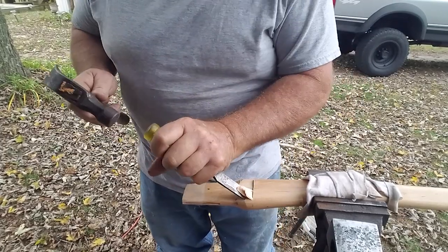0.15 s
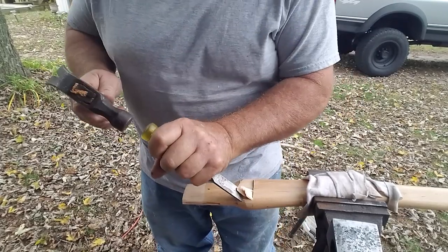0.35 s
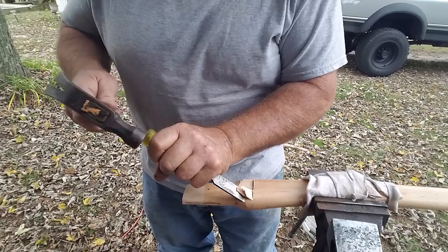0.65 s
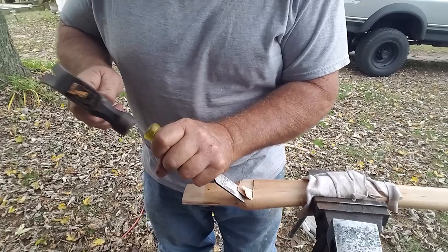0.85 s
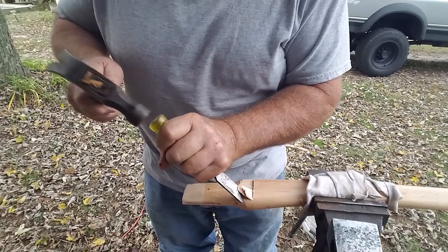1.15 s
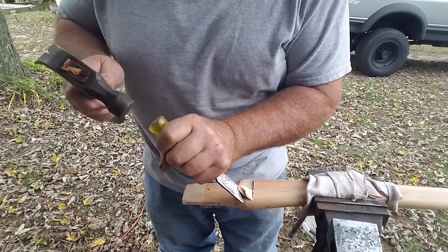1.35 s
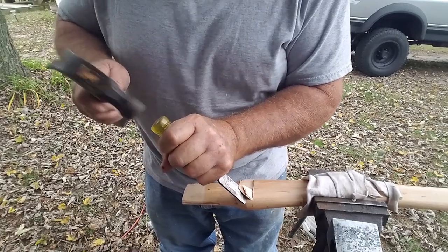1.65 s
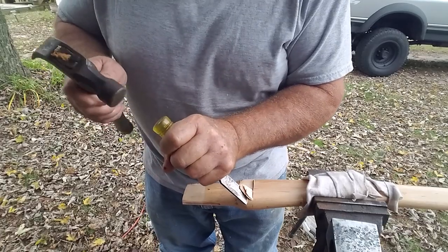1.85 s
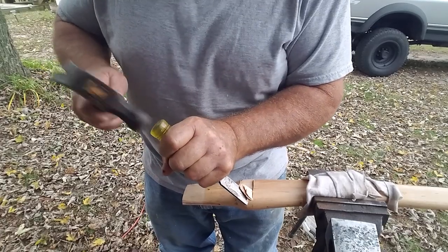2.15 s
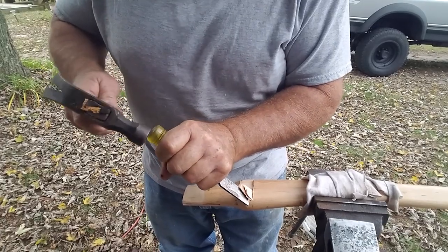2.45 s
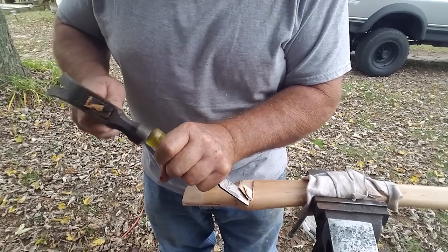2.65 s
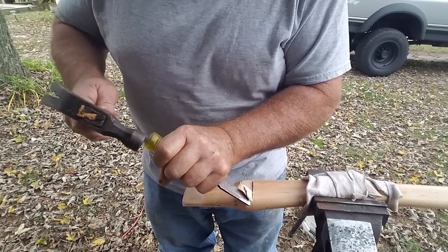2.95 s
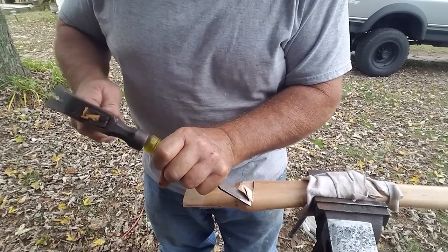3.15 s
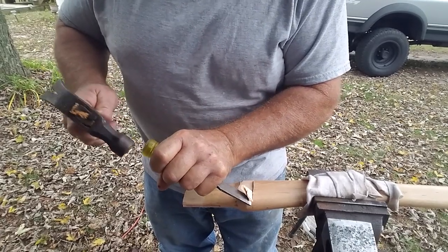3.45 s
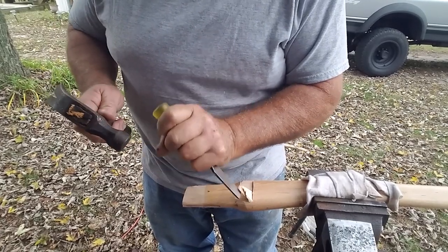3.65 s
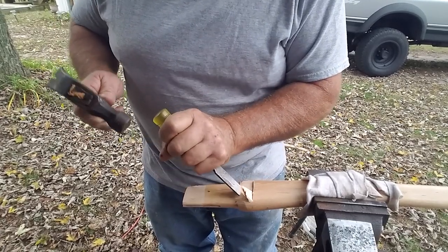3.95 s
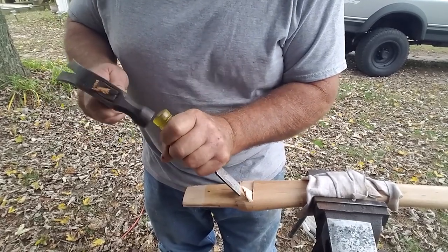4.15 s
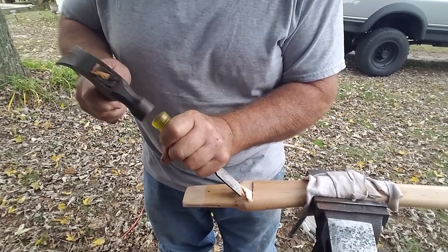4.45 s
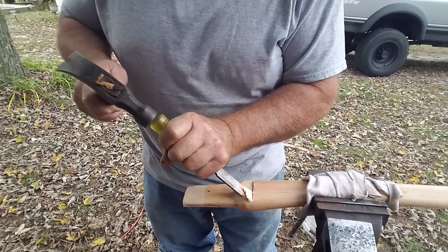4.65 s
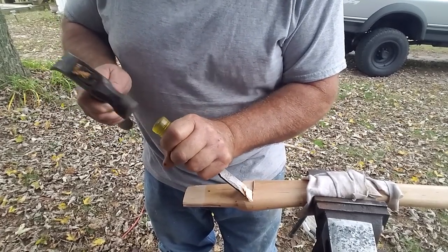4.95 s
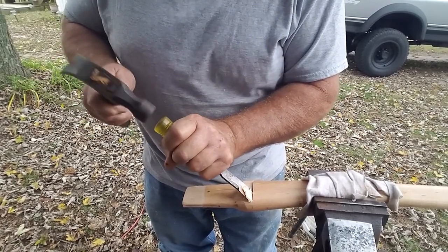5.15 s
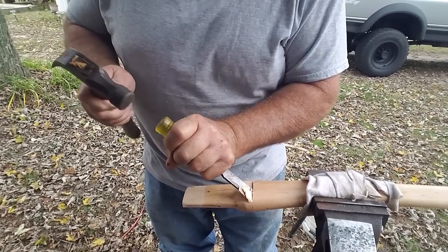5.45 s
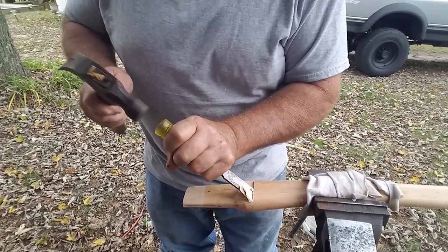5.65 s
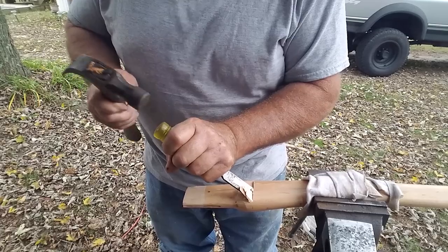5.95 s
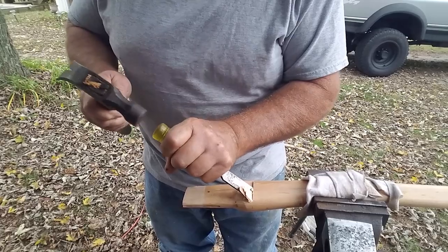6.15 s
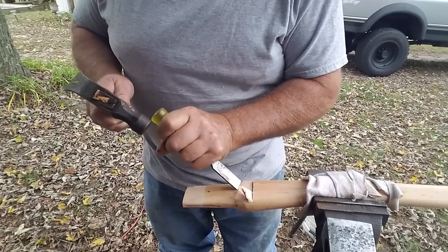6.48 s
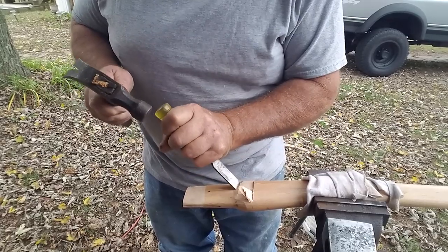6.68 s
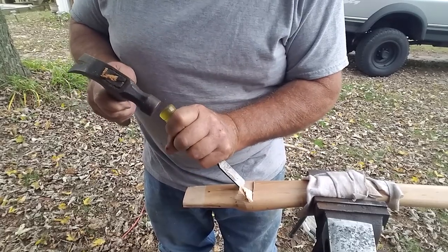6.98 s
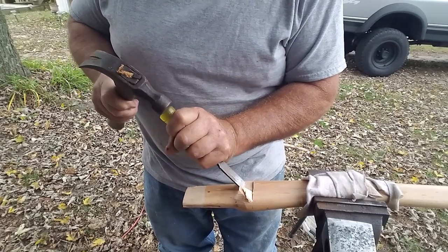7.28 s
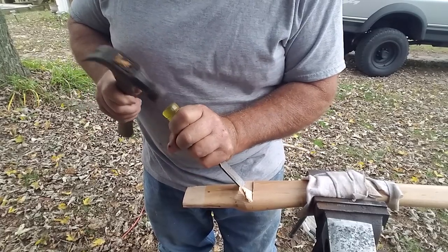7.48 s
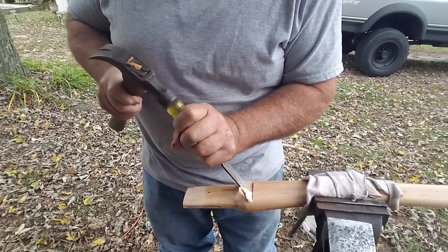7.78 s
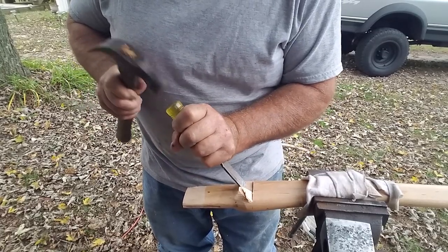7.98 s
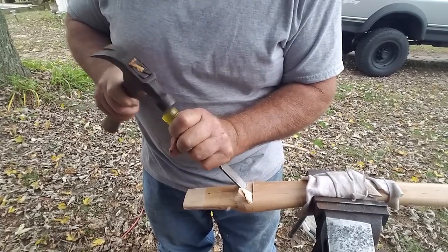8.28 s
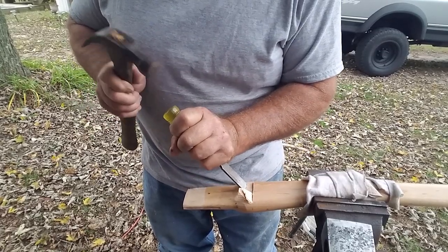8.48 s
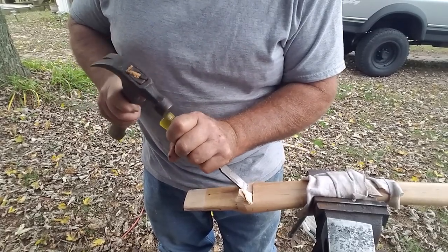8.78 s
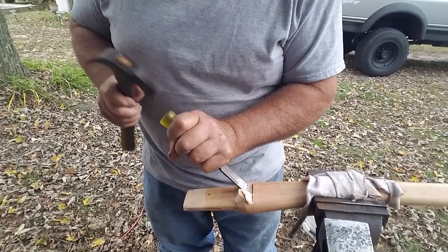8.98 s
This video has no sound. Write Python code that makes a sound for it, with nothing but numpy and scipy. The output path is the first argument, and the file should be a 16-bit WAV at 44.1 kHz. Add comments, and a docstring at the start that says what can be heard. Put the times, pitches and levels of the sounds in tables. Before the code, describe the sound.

Light taps build into steady hard hammer blows on a chisel in clamped wood, a loose vise bar rattling, faint birdsong behind.

```python
"""Runs of hammer blows on a chisel: each a crack and a woody knock, then a bench thump and sway.
The chisel cuts a wooden tool handle clamped in a bench vise; light taps seat it between the runs.
Hard, sharp blows throw up the vise's loose steel bar, which clanks down and rings.
Behind: steady air, a chirping bird, faint far whines. Bodies are sums of damped modes plus shaped noise.
"""
import sys
import numpy as np
from scipy import signal
from scipy.fft import rfft, irfft, next_fast_len
from scipy.io import wavfile

SR = 44100
rng = np.random.default_rng(int(sys.argv[2]) if len(sys.argv) > 2 else 0)


def persist_wave(psi):
    """Save psi, clipped to +-1, as 16-bit WAV."""
    counts = np.round(np.clip(psi, -1, 1) * 32767).astype(np.int16)
    wavfile.write(sys.argv[1], SR, np.atleast_2d(counts).T)


N = 402191
AGE = np.arange(int(.2 * SR)) / SR  # s, time axis of a short sound
LONG = np.arange(int(.55 * SR)) / SR  # s, time axis of a long ring


def amp(db):
    """Decibels to gain."""
    return 10 ** (np.asarray(db) / 20)


def along(points, hz):
    """Interpolate (f/Hz, value) points on a log frequency axis."""
    f, v = np.transpose(points)
    return np.interp(np.log(hz + 1), np.log(f), v)


def filtered(x, response):
    """Multiply the spectrum of x by response(f/Hz)."""
    size = x.shape[-1]
    padded = next_fast_len(size + size // 16, True)
    spectrum = rfft(x, padded) * response(np.fft.rfftfreq(padded, 1 / SR))
    return irfft(spectrum, padded)[..., :size]


def noise(spectrum, size, spread):
    """Coloured stereo noise, rms 1; spread is the gain of the part that differs between channels."""
    white = rng.standard_normal((2, size))
    mid, side = filtered(white, lambda hz: amp(along(spectrum, hz)))
    pair = np.array([mid + spread * side, mid - spread * side])
    return pair / pair.std()


def dying(x, decay):
    """Fade each frequency of x with its own t60."""
    hz, t, z = signal.stft(x, SR, nperseg=128)
    fade = amp(-60 * t / along(decay, hz)[:, None])
    return signal.istft(z * fade, SR, nperseg=128)[1][:, :x.shape[1]]


def burst(x):
    """Scale a short sound to the energy of 10 ms at rms 1."""
    energy = np.mean(x ** 2) * x.shape[-1] / SR * 100
    return x / np.sqrt(energy)


def any_phase():
    """Random phase in radians."""
    return rng.uniform(0, 2 * np.pi)


def mode(hz, t60, attack, phase=0, t=AGE):
    """One damped vibration: exponential build-up (time constant attack, s) and decay (t60, s)."""
    envelope = np.exp(-np.log(1000) * t / t60) * (1 - np.exp(-t / attack))
    return np.sin(2 * np.pi * hz * t + phase) * envelope


def ring(modes, attack, scatter_db, detune):
    """All modes of a body; level, pitch and phase vary from strike to strike."""
    out = 0
    for k, (hz, db, t60) in enumerate(modes):
        level_dev, pitch_dev, phase_dev = rng.standard_normal(3)
        gain = amp(db + scatter_db * level_dev)
        out = out + gain * mode(hz * (1 + detune * pitch_dev), t60, attack, k * np.pi + phase_dev / 2)
    return out


def add(track, s, sound):
    """Mix a sound into a track at time s."""
    part = track[:, max(round(s * SR), 0):][:, :sound.shape[-1]]
    part += sound[..., :part.shape[1]]


def wobble(rate):
    """Random piecewise-linear curve, rate knots/s."""
    knots = rng.standard_normal(4096)
    return np.interp(np.arange(N) * rate / SR, np.arange(len(knots)), knots)


# crowded wood and iron modes, spectrum: (f/Hz, relative level/dB)
CLATTER_SPECTRUM = [(60, -19), (250, -5), (600, 2), (1000, 6.5), (1700, -0.5), (2700, -9.5), (3800, -15),
                    (4800, -20.5), (7000, -25.5), (10000, -35), (15500, -58)]
# their decay: (f/Hz, t60/s)
CLATTER_DECAY = [(200, 0.25), (1000, 0.057), (3000, 0.08), (12000, 0.095)]


def clatter(spread):
    """Many short, crowded modes of wood and iron, as noise decaying per frequency."""
    return burst(dying(noise(CLATTER_SPECTRUM, size=len(AGE), spread=spread), CLATTER_DECAY))


# outdoor air, spectrum: (f/Hz, relative level/dB)
AIR_SPECTRUM = [(25, -11), (60, -1), (150, -2.5), (250, -3.5), (450, -0.5), (700, -4.5), (1100, -11.5),
                (2000, -15.5), (2650, -14.5), (3600, -20), (5100, -22.5), (6000, -19), (6900, -29),
                (9000, -33.5), (14000, -27)]
# far whining tones: (t/s, length/s, f/Hz at mid-tone, level/dB)
WHINE_TONES = [(5.95, .75, 1570, -74), (6.45, .8, 1385, -68), (6.5, .8, 1855, -67), (6.45, .75, 1680, -69),
               (6.95, 1.35, 1660, -62)]
WHINE_ARCH = .02  # share by which a tone is flatter at its ends


def distance():
    """Steady air noise, and faint wavering whines that swell, arch in pitch and fade."""
    out = amp(-56.5) * noise(AIR_SPECTRUM, size=N, spread=.85)
    for start_s, length_s, hz, db in WHINE_TONES:
        arch = np.sin(np.pi * np.clip((np.arange(N) / SR - start_s) / length_s, 0, 1))
        level = amp(db + 3.5 * wobble(rate=24)) * arch ** 1.5
        waver_hz = 7 * wobble(rate=5) + 26 * wobble(rate=70)
        pitch_hz = hz * (1 - WHINE_ARCH * (1 - arch)) + waver_hz
        out = out + level * np.sin(2 * np.pi * np.cumsum(pitch_hz) / SR)
    return out


# decay of the yard's scatter: (f/Hz, t60/s)
YARD_DECAY = [(100, 4), (300, 0.54), (1000, 0.54), (4000, 0.47), (12000, 0.093)]


def yard(x):
    """A thin scatter from trees and ground, and one dull echo off a wall."""
    t = np.arange(SR) / SR
    tail = dying(rng.standard_normal((2, SR)), YARD_DECAY) * (1 - np.exp(-t / 0.012))
    response = amp(-36.5) * tail / np.linalg.norm(tail[0])
    wall = signal.windows.hann(11) / 5
    add(response, .094, amp(-40) * wall)
    return signal.oaconvolve(x, response, axes=1)[:, :N]


# two-note calls: (t/s, 2nd note level/dB)
CALLS = [(1.562, -49), (2.322, -54), (3.874, -49), (4.736, -47), (6.312, -54), (7.056, -51), (7.498, -48),
         (7.9, -58.5), (8.42, -55), (8.89, -58)]
NOTE_GAP_S, FIRST_NOTE_DB = .063, -4  # first note relative to second
NOTE_HZ, NOTE_STEP_HZ = 4276, 20
NOTE_FALL_HZ_PER_S, NOTE_FALL_HZ = 8000, 327


def bird():
    """Pairs of short falling whistles, the second louder and higher, blurred by the trees."""
    out = np.zeros((2, N))
    for s, db in CALLS:
        for k, note_db in enumerate([db + FIRST_NOTE_DB, db]):
            fall_hz = np.minimum(NOTE_FALL_HZ_PER_S * AGE, NOTE_FALL_HZ)
            hz = NOTE_HZ + k * NOTE_STEP_HZ - fall_hz
            swell = np.exp(-((AGE - .018) / .0095) ** 2)
            note = swell * np.sin(2 * np.pi * np.cumsum(hz) / SR)
            leaves = rng.standard_normal((2, len(AGE))) * amp(-60 * AGE / 0.19)
            leaves = leaves / np.linalg.norm(leaves[0])
            blur = signal.fftconvolve(note[None], leaves, axes=1)[:, :len(AGE)]
            add(out, s + k * NOTE_GAP_S, amp(note_db) * (note + 0.94 * blur))
    return out


# chisel shifting in its cut: (t/s, rub level/dB, wood hum level/dB)
CHISEL_SHIFTS = [(.215, -56, -64), (.255, -51, -48.5), (0.324, -51.5, -50.5), (.722, -49, -79),
                 (2.513, -40, -28.5), (6.143, -56, -58), (6.491, -37.5, -29), (6.609, -42, -34),
                 (8.108, -44.5, -34.5)]


def shifts():
    """The blade rubs softly in the cut (band-shaped clatter) and stirs two modes of the clamped wood."""
    out = np.zeros((2, N))
    for s, rub_db, hum_db in CHISEL_SHIFTS:
        rub = filtered(clatter(spread=0.36), lambda hz: hz / (hz + 600) / (1 + (hz / 3200) ** 2))
        rub = rub * (1 - np.exp(-AGE / 0.057))
        hum = ring([(312, 0, .12), (255, -6, .07)], attack=.012, scatter_db=1.5, detune=.02)
        add(out, s, amp(rub_db - 1) * burst(rub) + amp(hum_db) * burst(hum))
    return out


# off-centre blows that set the blade singing: (t/s, level/dB)
BLADE_SINGS = [(2.165, -50), (5.531, -33.5), (6.005, -33.5), (8.534, -36), (8.778, -38), (9.013, -51)]


def blade():
    """The free length of steel rings in two high modes."""
    out = np.zeros((2, N))
    for s, db in BLADE_SINGS:
        add(out, s, amp(db) * (mode(8870, .125, .003) + amp(-6) * mode(14300, .13, .003)))
    return out


FIRM_THUMP_DB, FIRM_CRACK_DB = -12, -25  # reference blow for bar and bench

# vise bar modes: (f/Hz, relative level/dB, t60/s, group: 0 clank, 1 low, 2 middle, 3 high ring)
BAR_MODES = [(2380, 6.5, .075, 0), (2490, 2, .07, 0), (2720, -3, .08, 0), (1500, -4, .09, 0),
             (3090, -6, .1, 0), (3490, 14, .47, 1), (6218, 2, .24, 2), (6514, 9, .11, 2), (6834, 9, .16, 2),
             (7887, 2, .17, 2), (8866, 14, .13, 2), (8993, 8, .12, 2), (9590, 4, .11, 2),
             (14300, 9, .13, 2), (15140, 6, .13, 2), (11350, 17, .21, 3)]
# ring damped by the socket, for the reference blow: (low, middle, high level/dB)
HELD_RING_DB = (-67.5, -73.5, -89.5)
# blows after which the bar hangs free: (t/s, low, middle, high ring level/dB)
FREE_BAR_RINGS = [(2.16, -53, -50, -63), (2.4, -67, -51.5, -57.5), (2.88, -58, -61.5, -86),
                  (3.11, -54.5, -66, -97.5), (3.32, -51, -81, -92), (4.34, -61.5, -79.5, -87),
                  (5.77, -58.5, -65.5, -86), (8.27, -52.5, -77, -101.5), (8.77, -58.5, -66.5, -82),
                  (9.01, -59.5, -60, -90)]
THROW_THUMP_DB, THROW_CRACK_DB = -15, -34  # bar jumps only when both are exceeded
BAR_FLIGHT_S = .0275
CLANK_DB, CLANK_PER_THUMP_DB, CLANK_PER_CRACK_DB = -29.5, 1.92, 0.69
CHATTER_GAP_S = .007  # mean
CHATTER_LOSS_DB, CLACK_LOSS_DB = 8, 5.5  # per contact


def vise_bar():
    """Thrown up by a hard blow, the loose bar drops back, chatters in its socket and rings on."""
    out = np.zeros((2, N))
    for s, *_, crack_db, thump_db in BLOW_LIST:
        if thump_db <= THROW_THUMP_DB or crack_db <= THROW_CRACK_DB:
            continue
        throw_db = CLANK_PER_THUMP_DB * (thump_db - FIRM_THUMP_DB)
        throw_db += CLANK_PER_CRACK_DB * (crack_db - FIRM_CRACK_DB)
        free = [levels for at, *levels in FREE_BAR_RINGS if abs(at - s) < .05]
        ring_db = free[0] if free else np.add(HELD_RING_DB, throw_db)
        group_db = [CLANK_DB + throw_db, *ring_db]
        landing_s = s + BAR_FLIGHT_S
        for hz, db, t60, group in BAR_MODES:
            gain = amp(db + group_db[round(group)] + rng.normal(0, 0.91))
            add(out, landing_s, gain * mode(hz, t60, .001, any_phase(), LONG))
        # ever weaker contacts at uneven moments; the clack loses less per contact than the noise
        gaps_s = CHATTER_GAP_S * (.5 + rng.random(size=3))
        for k, late_s in enumerate(np.cumsum([0, *gaps_s])):
            clack = amp(6.5 - CLACK_LOSS_DB * k) * mode(2460 * rng.normal(1, 0.024), 0.042, .0008)
            chatter = amp(5.0 - CHATTER_LOSS_DB * k) * clatter(spread=0.81)
            add(out, landing_s + late_s, amp(group_db[0]) * (chatter + clack))
    return out


# vise-on-bench modes: (f/Hz, relative level/dB, t60/s)
VISE_MODES = [(182.1, -9.5, 0.23), (230, -7.5, 0.091), (272.6, -11.5, 0.19), (340, -17, 0.2),
              (467, -8.5, 0.093), (910, -8, 0.022)]
# slow bench modes: (f/Hz, relative level/dB, t60/s, build-up/s)
BENCH_MODES = [(59, -4, 0.43, 0.079), (74.7, -3, 0.46, 0.073), (91.9, -3, 0.51, 0.098),
               (107.05, 5, 0.29, 0.019), (130, -6, 0.4, 0.014)]
# a harder blow thumps lower and sways the bench more
THUMP_DELAY_S, THUMP_HZ, THUMP_SAG_HZ_PER_DB = .0105, 254.4, 2.87
SWAY_DB, SWAY_DB_PER_DB, GROUNDED_SWAY_DB = -20, 1.2, -2.5  # last: offset if the bench stays down
LIFT_DB = -15  # above this thump the bench rocks and lands again
LANDING_S, LANDING_SCATTER_S, LANDING_LAG_S_PER_S = .029, .002, 0.0012  # later as the work goes on
LANDING_DB, LANDING_DB_PER_DB = -18, 1.52


def bench():
    """The vise takes up its slack just after each blow and thumps; the bench sways, rocks and lands."""
    out = np.zeros((2, N))
    for s, *_, thump_db in BLOW_LIST:
        force_db, lifted = thump_db - FIRM_THUMP_DB, thump_db > LIFT_DB
        thump_hz = THUMP_HZ - THUMP_SAG_HZ_PER_DB * force_db
        # one heavily damped lurch of about two cycles
        lurch = np.exp(-((AGE - .0052) / .0042) ** 2) * np.sin(2 * np.pi * thump_hz * AGE)
        iron = ring(VISE_MODES, attack=0.00075, scatter_db=6, detune=.025)
        thump = amp(thump_db - 0.2) * burst(lurch) + amp(thump_db - 5.0) * burst(iron)
        add(out, s + THUMP_DELAY_S, thump + amp(thump_db - 12.5) * clatter(spread=0.35))

        sway = 0
        for hz, db, t60, rise_s in BENCH_MODES:
            gain = amp(db + rng.normal(0, 1.9))
            sway = sway + gain * mode(hz * rng.normal(1, .025), t60, rise_s, any_phase(), LONG)
        sway_db = SWAY_DB + SWAY_DB_PER_DB * force_db + (0 if lifted else GROUNDED_SWAY_DB)
        add(out, s + .012, amp(sway_db) * burst(sway))

        if lifted:
            thud = amp(10.0) * mode(285 * rng.normal(1, 0.079), 0.022, 0.0043)
            thud = thud + amp(-8.5) * ring(VISE_MODES, attack=0.00083, scatter_db=3.0, detune=0.024)
            landing_s = s + rng.normal(LANDING_S + LANDING_LAG_S_PER_S * s, LANDING_SCATTER_S)
            add(out, landing_s, amp(LANDING_DB + LANDING_DB_PER_DB * force_db) * burst(thud))
    return out


# hammer blows: (t/s, knock level/dB, knock f/Hz, crack level/dB, bench thump level/dB)
BLOW_LIST = [(0.603, -23.5, 1010, -40.5, -31.5), (0.892, -30.5, 930, -47.5, -32),
             (1.1721, -23, 1050, -36, -30.0), (1.427, -17, 1044, -28.5, -18),
             (1.6703, -18, 1004, -22.5, -12), (1.9248, -14, 987, -23.0, -8.5),
             (2.1601, -12.5, 974, -20, -9), (2.3998, -13, 970, -23, -9.5),
             (2.6491, -16, 1007, -22.5, -11.5), (2.88, -14.0, 1020, -24, -10.5),
             (3.1089, -14, 1004.0, -24.5, -10), (3.321, -13.5, 925.0, -26, -9.0),
             (3.774, -22.5, 1083, -50.0, -26), (4.1239, -16.5, 1050, -38.0, -14.5),
             (4.3445, -13.0, 1013, -29.5, -12.5), (4.578, -12.5, 940, -24.5, -11.5),
             (4.8236, -14, 1107, -25, -14.5), (5.0719, -16.5, 1295, -29, -15.5),
             (5.3008, -16, 1180, -27, -12), (5.526, -13, 1010, -22, -12.5),
             (5.7667, -15.5, 1040, -24.5, -13), (6.0016, -17.5, 1010, -27, -12),
             (6.4759, -25.5, 1064.0, -53, -34), (6.9182, -22.5, 1094, -62.5, -29.5),
             (7.2458, -20.5, 1085, -38, -23.5), (7.5065, -14.0, 970, -31, -10.5),
             (7.766, -13, 1002.0, -26.5, -10.0), (8.0115, -14.5, 1036, -26, -12.0),
             (8.2677, -13.5, 1040, -22, -11.5), (8.533, -12.5, 1020, -25, -13),
             (8.7734, -13.5, 1056, -24.5, -10.5), (9.01, -15.5, 1020, -24.5, -12.0)]
# clamped wood and chisel modes: (f/Hz, relative level/dB, t60/s)
WOOD_MODES = [(222.3, -12, 0.06), (456.4, -17.5, 0.16), (574, -11, 0.076), (725, -18.5, 0.14),
              (1241, -13, 0.085), (1514, -11, 0.035), (1604, -10, 0.064), (1882, -30.5, 0.044),
              (2495, -15, 0.11), (2752, -8, 0.041), (2963, -15.5, 0.076)]
# steel blade and hammer head modes: (f/Hz, relative level/dB, t60/s)
STEEL_MODES = [(3500, -11, 0.013), (3915, 12.5, 0.018), (4580, -1.5, 0.063), (5450, -7.5, 0.094),
               (5880, -3.5, 0.045), (8620, -11.5, 0.036), (14300, -18, 0.085)]
# crack, spectrum: (f/Hz, relative level/dB)
CRACK_SPECTRUM = [(300, -17), (1500, 2.5), (2700, -4), (3900, -1), (4500, -6), (6000, -12.5), (7500, -14),
                  (9200, -21), (11800, -17), (15500, -24)]
# where the chisel is seated: (from t/s, 2nd resonance f/Hz, its relative level/dB, tock offset/dB)
CHISEL_SEATS = [(0, 1900, 0, -4), (3.6, 1400, 1, -9.5), (5.4, 1290, 0, -8)]
TOCK_HZ, TOCK_SCATTER = 2230, .12  # scatter: random relative pitch change from blow to blow


def chisel():
    """A hard crack at the hammer face, steel ping, the wood's knock and the crunch of parting fibres."""
    out = np.zeros((2, N))
    snap = amp(-60 * AGE / 0.043) + amp(-11 - 60 * AGE / 0.15)
    for s, knock_db, knock_hz, crack_db, thump_db in BLOW_LIST:
        # a light tap leaves the chisel free to ring; a blow that bites damps it and drives the wood
        bite = np.clip((thump_db + 22.5) / 13, 0, 1)
        knock = amp(6) * mode(knock_hz, .048 - .024 * bite, .0003)
        clamped = bite * amp(2.5 + rng.normal(0, 0.29)) * mode(891, 0.11, 0.0048, any_phase())
        loose = amp(-3) * mode(312, .19, 0.00072)
        loose = loose + amp(-1) * mode(490 * rng.normal(1, 0.088), 0.032, .0005)
        _, seat_hz, seat_db, seat_tock_db = [row for row in CHISEL_SEATS if row[0] < s][-1]
        seated = amp(seat_db) * mode(seat_hz * rng.normal(1, 0.065), 0.028, 0.00045)
        grain = ring(WOOD_MODES, attack=0.00079, scatter_db=5.0, detune=0.016)
        wood = burst(knock + clamped + (1 - bite) * loose + seated + grain)
        crunch = burst(clatter(spread=0.39) * (1 + 2 * np.exp(-AGE / 0.0004)))
        body = amp(2) * wood + amp(-9.5 + 3.85 * bite) * crunch
        # a soft contact lasts longer and leaves out the treble
        corner_hz = 15000 * amp(.65 * (crack_db - knock_db))
        body = filtered(body, lambda hz: 1 / (1 + 1.3j * hz / corner_hz - (hz / corner_hz) ** 2))

        # two close upper resonances of the chisel's handle
        tock_db = (knock_db + crack_db) / 2 + seat_tock_db
        tock_hz = TOCK_HZ * (1 + TOCK_SCATTER * rng.uniform(-0.9, 1))
        upper = .7 * mode(tock_hz * 1.08, .03, .0003, any_phase())
        tock = burst(mode(tock_hz, .03, .0003) + upper)

        crack = burst(noise(CRACK_SPECTRUM, size=len(AGE), spread=0.95) * snap)
        ping = burst(ring(STEEL_MODES, attack=.0003, scatter_db=3.5, detune=0.0016))
        add(out, s - .0002, amp(crack_db + 3.5) * crack + amp(crack_db - 4.0) * ping)
        add(out, s, amp(knock_db - 0.68) * body + amp(tock_db) * tock)
    return out


# stereo balance of the workbench: (f/Hz, left - right level/dB)
STEREO_BALANCE = [(100, 2.5), (550, 3.5), (900, -0.5), (1300, 4), (2050, -2), (2800, 4), (4500, -2),
                  (6300, -7), (9800, -3), (12000, -4), (15500, -12.5)]
# stereo phase of the workbench: (f/Hz, left lead/rad)
STEREO_LEAD = [(900, 0), (1700, -0.87), (2500, 1.25), (3500, 1.4), (7000, 1.37), (12000, 1.6)]


def scene():
    """The workbench reaches left and right with different colour and phase; yard, bird and air add on."""
    work = chisel() + blade() + bench() + vise_bar() + shifts()
    sides = np.array([[.5], [-.5]])

    def to_sides(hz):
        """Half the level and phase difference to each side."""
        return amp(sides * along(STEREO_BALANCE, hz)) * np.exp(1j * sides * along(STEREO_LEAD, hz))

    return filtered(work, to_sides) + yard(work) + bird() + distance()


TOP_HZ = 15800


def record(dry):
    """Round off the tallest peaks, then low-pass steeply at TOP_HZ."""
    rounded = dry / (1 + np.abs(dry / 1.1) ** 6) ** (1 / 6)
    return filtered(rounded, lambda hz: 1 / (1 + np.exp(np.clip((hz - TOP_HZ) / 30, -50, 50))))


dry = scene()
out = record(dry)
persist_wave(out)
```